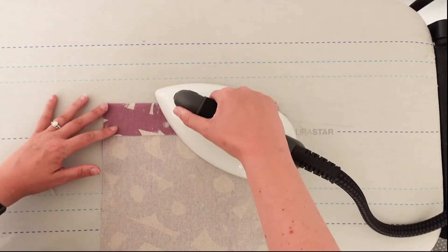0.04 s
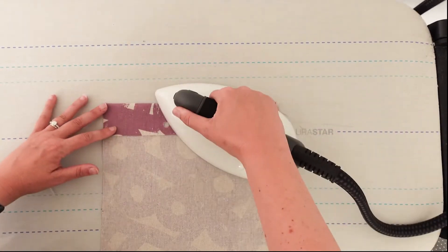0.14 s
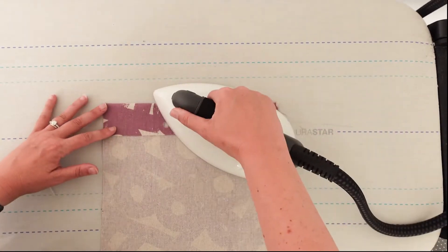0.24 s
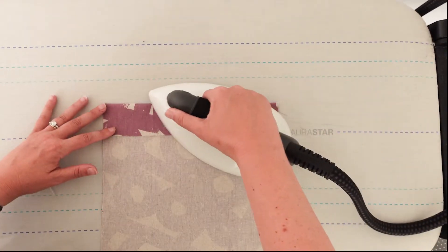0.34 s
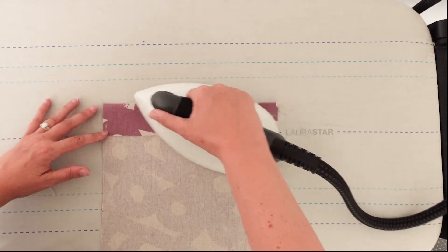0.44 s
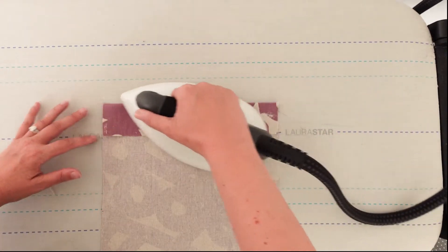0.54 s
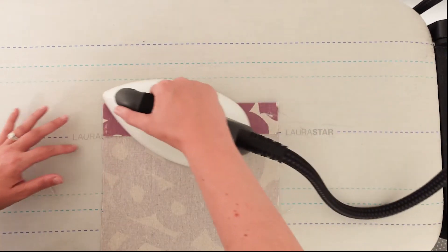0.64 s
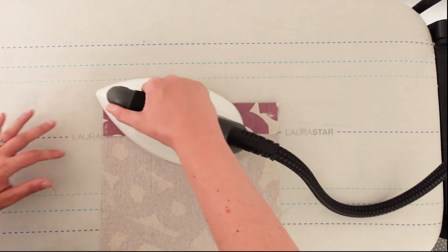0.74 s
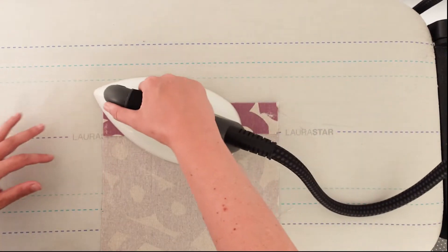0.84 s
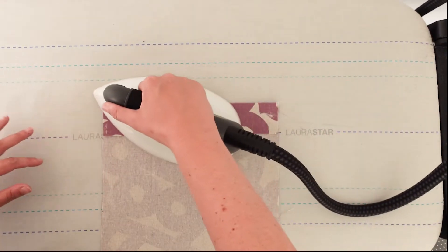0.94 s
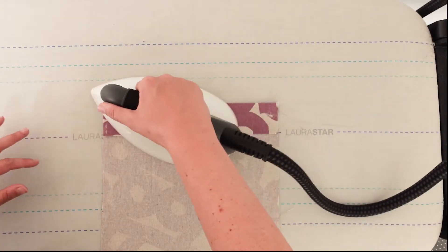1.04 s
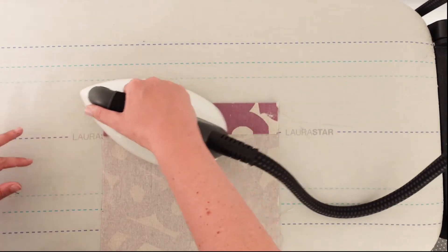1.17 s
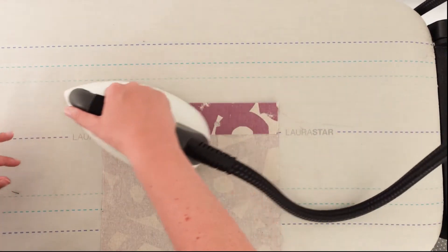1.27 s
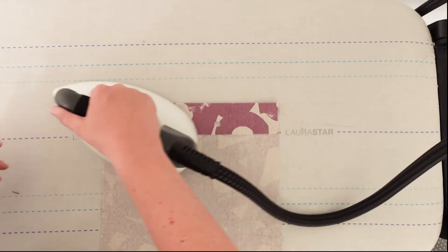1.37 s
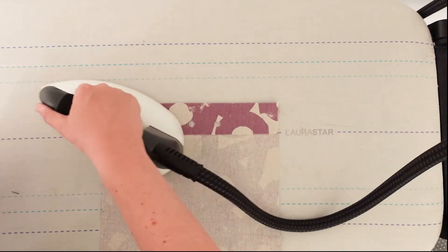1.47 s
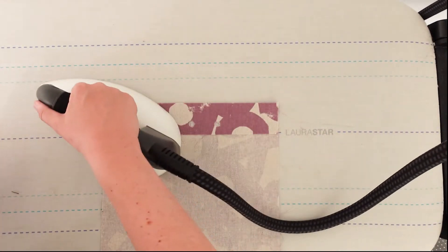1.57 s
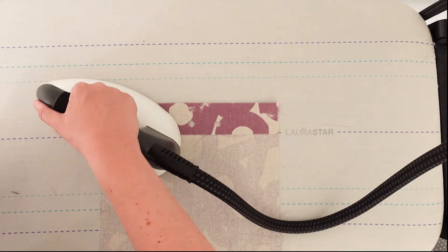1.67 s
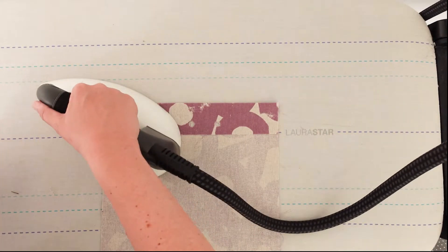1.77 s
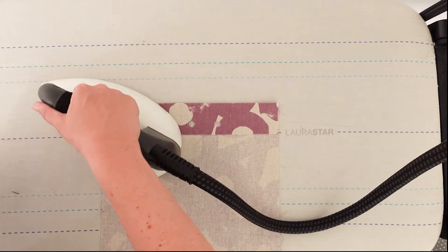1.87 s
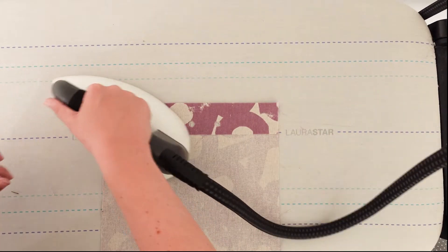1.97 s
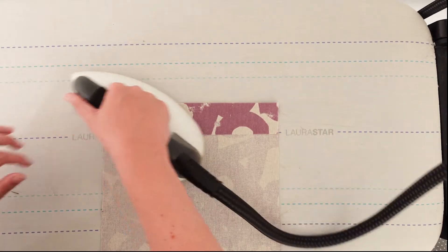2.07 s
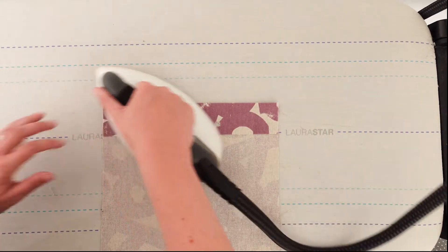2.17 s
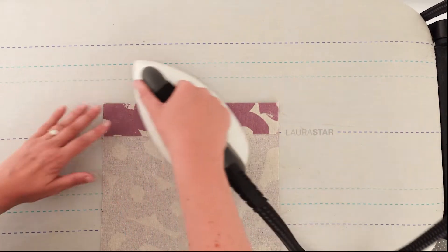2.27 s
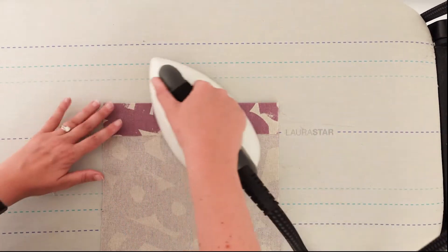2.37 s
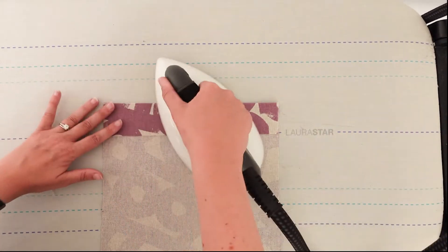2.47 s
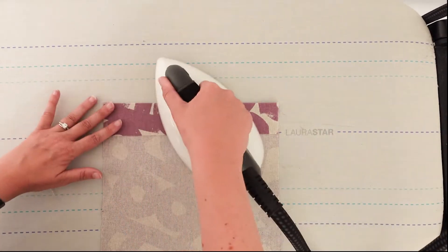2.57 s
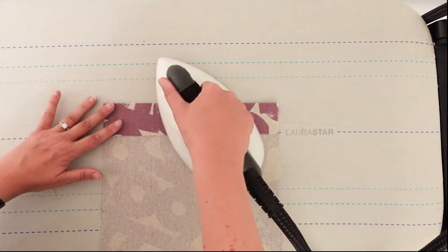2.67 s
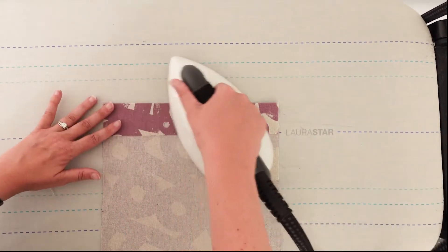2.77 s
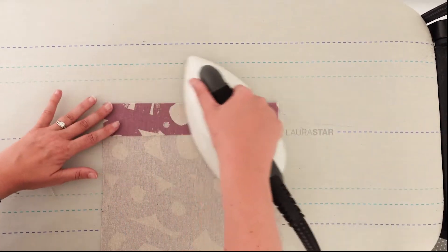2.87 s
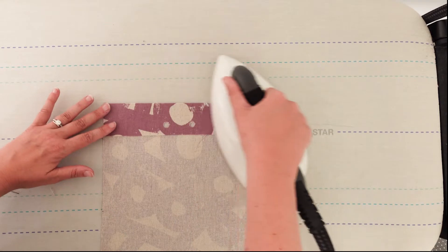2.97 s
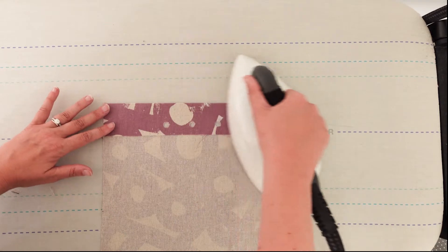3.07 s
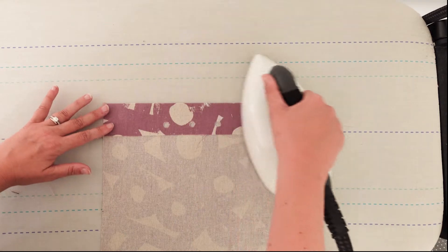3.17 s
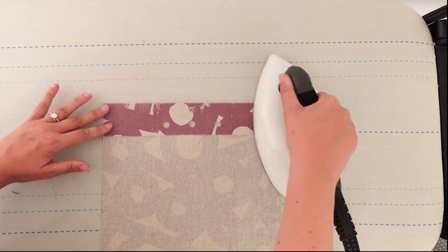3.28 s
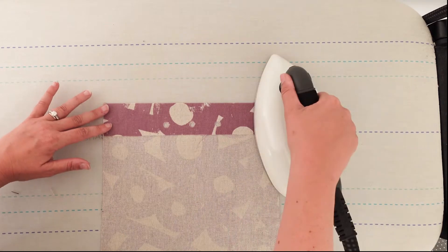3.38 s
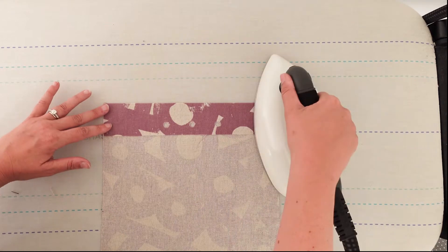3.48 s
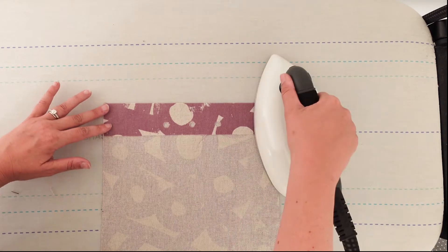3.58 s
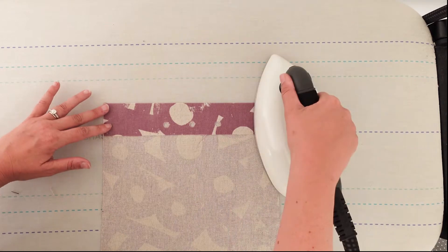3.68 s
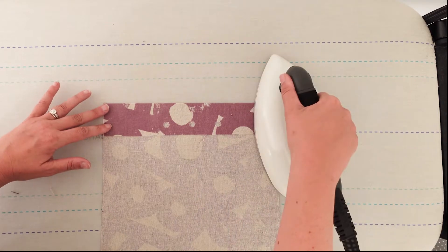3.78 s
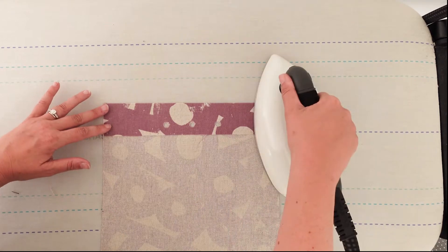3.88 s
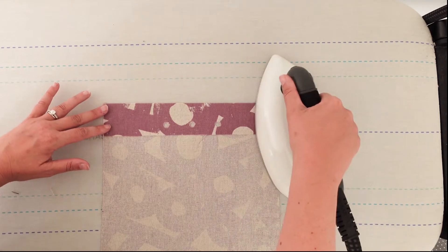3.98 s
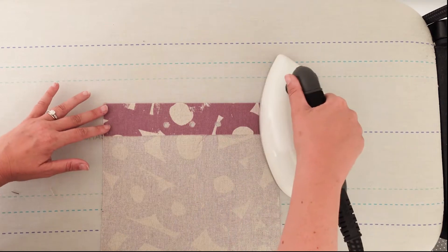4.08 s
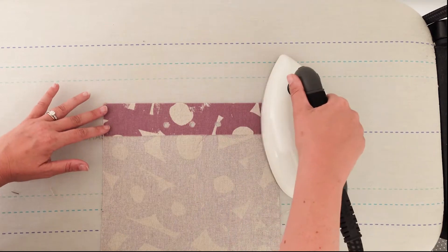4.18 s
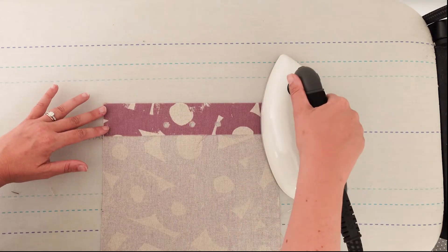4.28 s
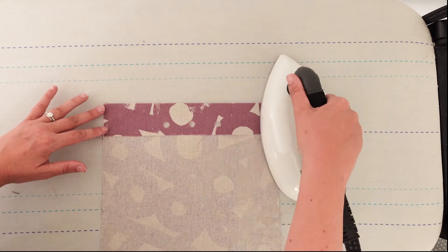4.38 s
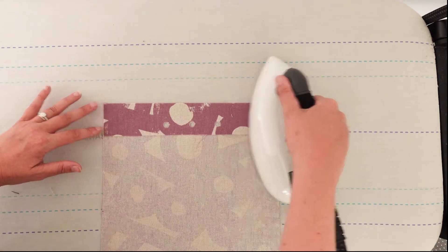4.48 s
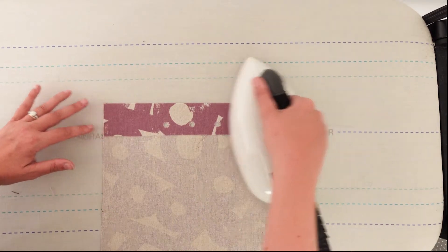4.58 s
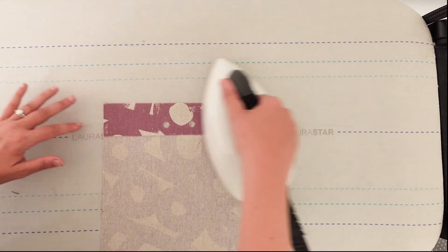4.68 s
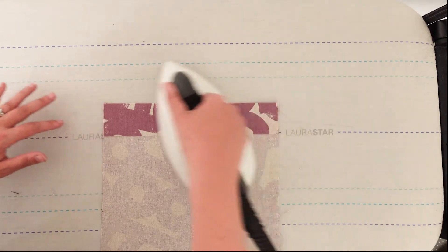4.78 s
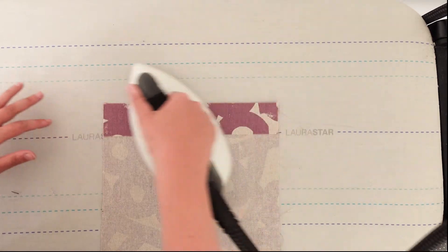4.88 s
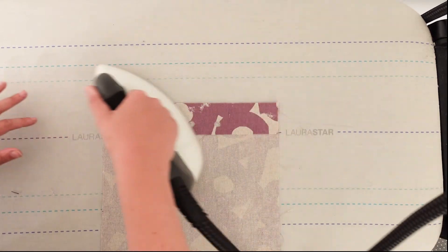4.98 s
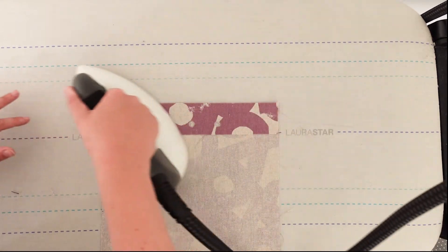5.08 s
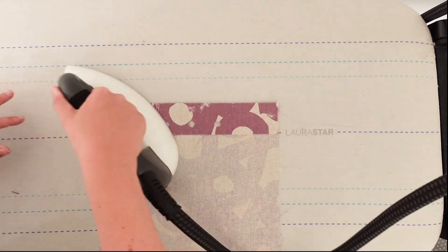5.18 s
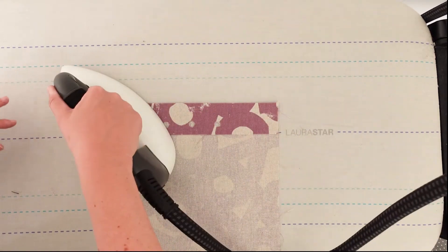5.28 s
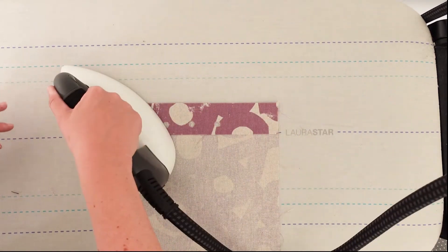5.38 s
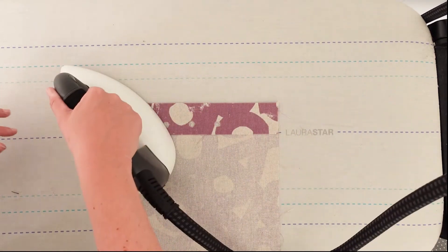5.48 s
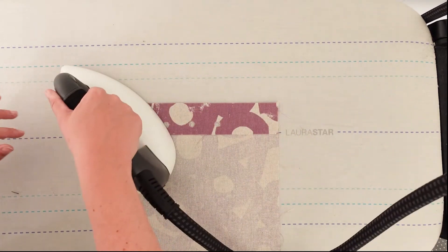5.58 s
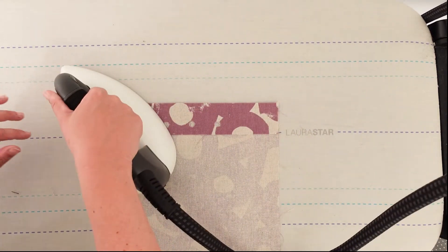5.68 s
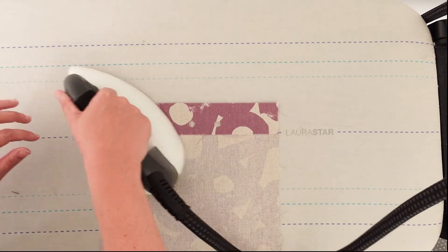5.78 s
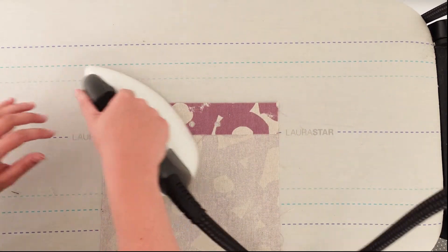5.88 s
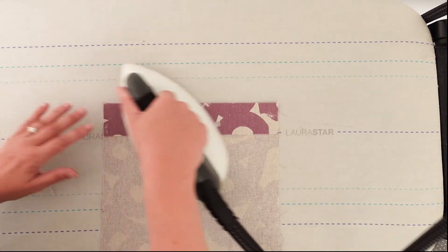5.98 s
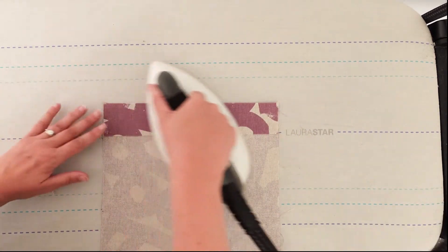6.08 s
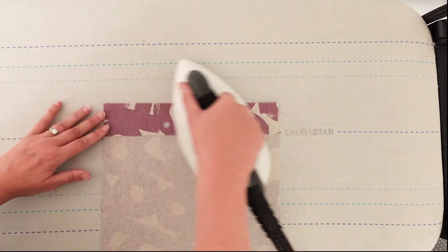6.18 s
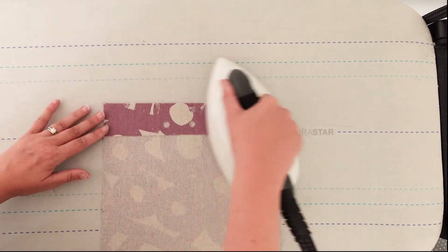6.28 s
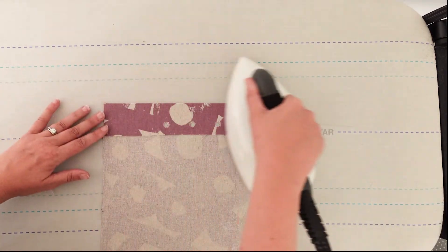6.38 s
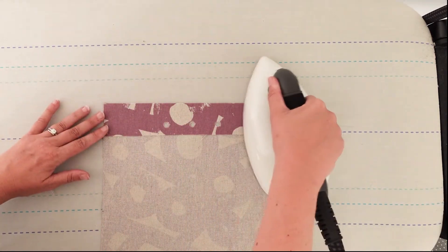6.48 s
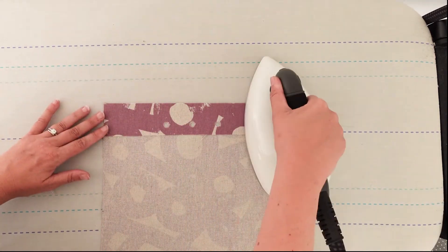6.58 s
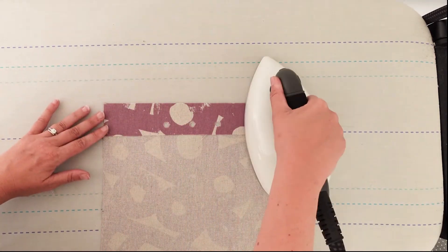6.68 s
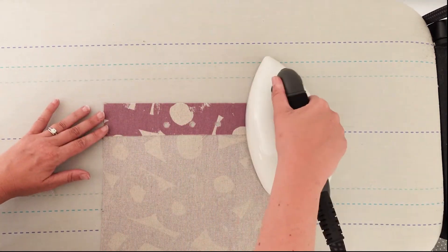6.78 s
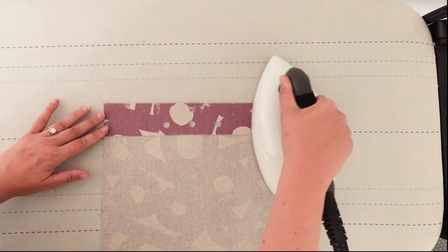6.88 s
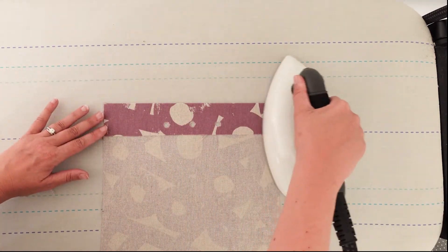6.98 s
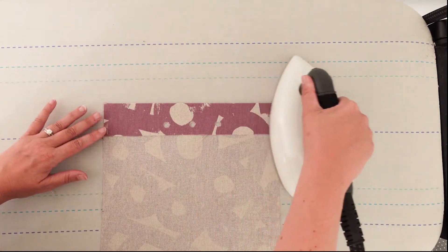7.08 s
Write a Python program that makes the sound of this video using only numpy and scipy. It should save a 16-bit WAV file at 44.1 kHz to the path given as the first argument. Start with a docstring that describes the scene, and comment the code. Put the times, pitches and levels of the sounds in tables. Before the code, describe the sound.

A steam iron works over cloth on a padded board, heard close in a small room with a steady low hum that eases a little after two seconds. Short bursts of steam come right at the start and at about 0.8, 1.7 and 2.5 seconds. Each begins with a light, ringing valve knock and a thin hiss, spits, then swells into a bright, slightly hollow rush; a second knock shuts it off and the hiss dulls and fades. Soft low bumps and brief scuffs of the iron on the board fall within the first second. A longer burst runs from 3.4 to about 4 seconds, followed by gentle bumps and a faint slide with small scuffs near 4.8. Another burst opens with a pop at 5.3 seconds. The iron slides faintly again around 6, and a last long hiss starts at 6.5, lasting to the end just after 7 seconds.

```python
"""A steam iron hisses as it presses cloth on a padded board in a small room, over a steady low hum. Seven times
its valve knocks open and rings the iron and the room: a thin hiss starts at once, the sole spits, and the
turbulent jet swells and brightens. When the valve knocks shut the pressure drains, treble first. The iron bumps
the board, scuffs and slides, and its place on the board colours the jet."""
import sys
import numpy as np
from scipy import signal
from scipy.fft import rfft, irfft
from scipy.io import wavfile
from scipy.ndimage import uniform_filter1d

SR = 44100
rng = np.random.default_rng(int(sys.argv[2]) if len(sys.argv) > 2 else 0)


def put_to_file(sound):
    """Save the sound as 16-bit audio at rate SR, in the file named by the first command-line argument."""
    columns = np.atleast_2d(sound).T  # one column per channel
    safe = np.clip(columns, -1, 1)
    whole_steps = np.round(safe * 32767)
    wavfile.write(sys.argv[1], SR, whole_steps.astype(np.int16))


N = 314874
TIME = np.arange(N) / SR
FREQS = np.maximum(np.fft.rfftfreq(N, 1 / SR), 1)


def undb(db):
    """Decibels to amplitude gain."""
    return 10 ** (np.asarray(db) / 20)


def curve(rows):
    """Linear interpolation of (time_s, value) rows at every sample."""
    return np.interp(TIME, *np.transpose(rows))


def spectrum(points):
    """Spectral envelope: gain from (frequency_hz, level_db) points joined on a log axis."""
    hz, db = np.transpose(points)
    return undb(np.interp(np.log(FREQS), np.log(hz), db))


def resonance(hz, width_hz):
    """Frequency response of a steep-sided resonance."""
    return 1 / (1 + ((FREQS / hz - hz / FREQS) * hz / width_hz) ** 2)


def noise(gain):
    """Gaussian noise of rms 1, shaped by a gain at every frequency."""
    x = irfft(rfft(rng.standard_normal(N)) * gain, N)
    return x / x.std()


def wander(rate_hz):
    """Slow random modulation of rms 1."""
    return noise(1 / (1 + (FREQS / rate_hz) ** 4))


def fade(t, t60):
    """Exponential decay by 60 dB in t60 seconds."""
    return np.exp(-np.log(1000) * t / t60)


def add(track, start_s, sound):
    """Superpose a sound on the track."""
    part = track[max(int(start_s * SR), 0):][:len(sound)]
    part += sound[:len(part)]


# resonances of the low drone: centre_hz, width_hz, level_db
DRONE_BANDS = [(116, 17, 1.5), (143, 22, 2)]
# course of the drone's level: time_s, level_db
DRONE_LEVEL = [(0, -50.5), (1.9, -49.5), (3.9, -57.5), (7.14, -57.5)]
# tone in the hum: pitch_hz, level_db
HUM_TONES = [(143.5, -68.5)]
# spectrum of the room's background: frequency_hz, level_db
ROOM_SPECTRUM = [(20, -22.5), (45, -15.5), (75, -12), (110, -3.5), (160, -3), (220, -18.5), (288, -3),
                 (340, -10), (430, -0.5), (560, -14.5), (760, -13.5), (1200, -21.5), (2200, -29.5),
                 (5000, -39), (10000, -40.5), (16000, -51.5)]
def hum(room_db=-54, whirr_db=-5):
    """Amplitude modulation: a narrow-band drone, a tone and a whirr waver over broadband room noise."""
    level_db = curve(DRONE_LEVEL)
    flutter_db = 2.2 * wander(9)
    drone = noise(sum(undb(db) * resonance(hz, width) for hz, width, db in DRONE_BANDS))
    drone *= undb(level_db + flutter_db)
    drifting_s = np.cumsum(1 + 0.0033 * wander(4.2)) / SR
    tones = sum(np.sqrt(2) * undb(db + 2 * wander(3.09)) * np.sin(2 * np.pi * hz * drifting_s)
                for hz, db in HUM_TONES)
    whirr = noise(resonance(hz=420, width_hz=110)) * undb(level_db + whirr_db + 1.8 * wander(10))
    air = noise(spectrum(ROOM_SPECTRUM)) * undb(room_db + 1.4 * wander(6.3))
    return drone + tones + whirr + air


# steam bursts, levels relative: open_s, shut_s, jet_wait_s, fill_s, drain_s, spit_delay_s, spit_db,
# peak_flow_db, rush_db, tick_db, pop_db, opening_knock_db, shutting_knock_db
BURSTS = [(.008, 0.266, .188, 0.07, 0.32, 0.031, -4.5, -8, 0, -27, -24, -25.5, -27.5),
          (.8178, 1.087, 0.059, 0.22, 0.67, .036, -13.5, -1, -1, -43, -19, -27.5, -26),
          (1.676, 1.884, 0.063, 0.085, 0.7, 0.063, -8.5, -1.08, 0.15, -43.5, -28, -26, -25),
          (2.5352, 2.743, 0.097, 0.038, 0.71, 0.071, -4.5, -1.9, -0.5, -38, -30, -27.5, -26.5),
          (3.394, 3.949, 0.053, 0.092, 0.84, 0.058, -7, -0.25, -0.3, -39, -44, -28.5, -29),
          (5.26, 5.602, 0.038, 0.072, 0.67, 0.053, -6, -1, 1.5, -35.5, -15.5, -26.5, -28.5),
          (6.5172, 7.3, .005, 0.14, .9, 0.054, -6.5, -.5, 0, -46, -26.5, -29, -49)]
# modes rung by the valve knocks, in the iron and the room: pitch_hz, t60_s, opening_db, shutting_db
KNOCK_MODES = [(288.2, 0.28, -10.5, -3.5), (338.2, 0.053, 6, 7.5), (392, 0.0856, -19, -5),
               (431.8, 0.25, -1.5, -3), (484.4, 0.41, -12, -12), (667, 0.078, -2.5, -23.5),
               (757, 0.12, -7, -4), (1433, 0.15, -9.5, -18), (1684, 0.13, -1.5, -33),
               (1920, 0.075, -16, -45)]
def valve_knocks(pop_hz=540, pop_delay_s=0.0041, open_rise_s=0.0027, shut_rise_s=0.0032,
                 ring_db=-5, shell_hz=170, detune=0.02, flat_share=0.0825, settle_s=0.018):
    """Impact excitation: the valve knock rings modes of the iron and the room; opening also sends a pop down
    the hose."""
    out, t = np.zeros(N), np.arange(SR // 3) / SR
    swing = 2 * np.pi * pop_hz * (t - pop_delay_s)
    pop = swing * np.exp((1 - swing ** 2) / 2)
    # each ring starts a little flat and rises as the pressure settles
    warped_s = t - flat_share * settle_s * (1 - np.exp(-t / settle_s))
    hz, t60, open_db, shut_db = np.transpose(KNOCK_MODES)
    for opens, shuts, *_, pop_db, open_knock_db, shut_knock_db in BURSTS:
        mode_hz = hz * (1 + detune * rng.standard_normal(len(hz)))
        phase = rng.uniform(0, 2 * np.pi, (len(hz), 1))
        rings = np.sin(2 * np.pi * np.outer(mode_hz, warped_s) + phase) * fade(t, t60[:, None])
        add(out, opens, undb(pop_db) * pop)
        add(out, opens, undb(open_db + open_knock_db + ring_db) @ rings * (1 - np.exp(-t / open_rise_s)))
        add(out, shuts, undb(shut_db + shut_knock_db + ring_db) @ rings * (1 - np.exp(-t / shut_rise_s)))
    # the small shell radiates little bass
    return signal.sosfilt(signal.butter(1, shell_hz, "high", fs=SR, output="sos"), out)


# spectrum of the open valve's thin hiss: frequency_hz, level_db
VALVE_SPECTRUM = [(300, -24.5), (1300, -7.5), (1600, -5), (2000, -10), (4000, -16), (7000, -7), (8500, 0),
                  (10000, 3.5), (12300, -7), (14300, -8.5), (16000, 0)]
def valve_hiss(hiss_db=-40, rise_s=0.0024, spurt=0.49, spurt_t60=0.098, closing_t60=0.15):
    """Orifice noise: steam hisses through the open valve, hardest in the first spurt."""
    envelope = np.zeros(N)
    for opens, shuts, *_ in BURSTS:
        age = np.maximum(TIME - opens, 0)
        onset = np.minimum(age / rise_s, 1) * (1 + spurt * fade(age, spurt_t60))
        envelope += onset * fade(np.maximum(TIME - shuts, 0), closing_t60)
    return envelope * noise(spectrum(VALVE_SPECTRUM)) * undb(hiss_db)


def valve_ticks(lag_s=0.008, width_s=0.0031):
    """Broadband transient: a bright tick as the valve leaves its seat."""
    envelope = sum(undb(tick_db) * np.exp(-((TIME - opens - lag_s) / width_s) ** 2)
                   for opens, *_, tick_db, _, _, _ in BURSTS)
    return envelope * noise(resonance(hz=9500, width_hz=9000))


def steam_flow(sag_db_per_s=8.5, drain_power=2.265, surge_lag_s=0.004, surge_width_s=0.038):
    """Charge and discharge: the sole spits, fills and drains. Gives flow and rush strength in dB."""
    flow_db, rush_db = np.full(N, -120.), np.zeros(N)
    for opens, shuts, wait_s, fill_s, drain_s, spit_s, spit_db, peak_db, burst_rush_db, *_ in BURSTS:
        now = TIME >= opens
        age, since_shut = TIME[now] - opens, np.maximum(TIME[now] - shuts, 0)
        spit = undb(spit_db) * (age / spit_s * np.exp(1 - age / spit_s)) ** 2
        fill = 1 - np.exp(-np.maximum(age - since_shut - wait_s, 0) / fill_s)
        swell_db = 20 * np.log10(np.hypot(spit, fill / fill.max()) + 1e-6)
        # the shutting valve gives a last push, which counts for more in a weak burst
        push = np.exp(-((TIME[now] - shuts - surge_lag_s) / surge_width_s) ** 2)
        surge_db = 0.83 * push / undb(peak_db)
        # the flow then sags steadily and collapses
        drop_db = sag_db_per_s * since_shut + 60 * (since_shut / drain_s) ** drain_power
        flow_db[now] = peak_db + swell_db + surge_db - drop_db
        rush_db[now] = burst_rush_db
    return flow_db, rush_db


# spectrum of the jet at full flow: frequency_hz, level_db
JET_SPECTRUM = [(100, -35), (300, -26.5), (550, -23.5), (800, -5), (1250, -5), (1700, -2.5), (2700, -4.5),
                (4200, -0.04), (7000, 5), (9500, 2.5), (12000, -1.5), (15500, -6.5)]
def jet(flow_db, rush_db, jet_db=-22, rush_hz=2900, treble_hz=7600):
    """Turbulence under the sole: higher bands follow higher powers of the flow, so treble dies first."""
    hiss = rfft(noise(spectrum(JET_SPECTRUM)))
    low = 1 / (1 + (FREQS / rush_hz) ** 4)
    high = 1 / (1 + (treble_hz / FREQS) ** 4)
    rush = irfft(hiss * low, N) * undb(0.92 * flow_db + rush_db + 3.5)
    core = irfft(hiss * (1 - low - high), N) * undb(1.467 * flow_db)
    treble = irfft(hiss * high, N) * undb(2.96 * flow_db + 1)
    flutter_db = wander(21)
    return (rush + core + treble) * undb(jet_db + flutter_db)


# resonances of the steam channels in the sole: centre_hz, width_hz, level_db
CHANNEL_BANDS = [(1545, 160, -5), (1946, 46, -3), (2225, 72, -2), (2854, 47, 2), (3437, 89, -0.5),
                 (3720, 99, -2.5), (4380, 120, 1.5), (5210, 61, -2), (5715, 450, 0), (6340, 102, -5.5),
                 (8270, 300, -14)]
def sole_channels(flow_db, channels_db=-34.5, flow_power=1.44):
    """Duct resonance: the channels sound hollow, swelling and fading with the flow."""
    channels = noise(sum(undb(db) * resonance(hz, width) for hz, width, db in CHANNEL_BANDS))
    return channels * undb(channels_db + flow_power * flow_db)


# soft bumps of the iron on the board: start_s, level_db
BUMPS = [(.078, -52), (.14, -32), (0.425, -28), (0.665, -37), (0.733, -34), (0.79, -32), (2.384, -37),
         (3.911, -32.5), (4.256, -35)]
def board_bumps(board_hz=138, t60=0.15, rise_s=0.0089):
    """Damped oscillation: the padded board booms in one low mode under the iron."""
    out, t = np.zeros(N), np.arange(SR // 3) / SR
    boom = np.sin(2 * np.pi * board_hz * t) * fade(t, t60) * (1 - np.exp(-t / rise_s))
    for start_s, db in BUMPS:
        add(out, start_s, undb(db) * boom)
    return out


# short scuffs of sole and hose: start_s, length_s, level_db
SCUFFS = [(.138, .035, -45), (.182, .04, -41), (.753, .012, -51), (4.762, .01, -46.5), (4.839, .018, -52),
          (6.326, .012, -46), (6.345, .04, -57)]
def scuffs():
    """Brief friction: each rub gives a pulse of midrange noise."""
    contact = np.zeros(N)
    for start_s, length_s, db in SCUFFS:
        add(contact, start_s, undb(db) * np.hanning(int(length_s * SR)) ** 0.5)
    rub = noise(resonance(730, 230) + 0.45 * resonance(1230, 280) + 0.009 * resonance(3000, 3000))
    return contact * rub


# slides of the iron over the cloth: start_s, end_s, place_reached, friction_db
SLIDES = [(.4, 0.904, "left", -72), (2.107, 2.502, "middle", -89.5), (2.794, 3.25, "right", -73.5),
          (4.5, 5.201, "corner", -75), (5.85, 6.203, "middle", -70), (6.2, 6.515, "right", -69.5)]
def glide(ease_s=0.22):
    """Sliding friction: noise from the sole on the weave swells and dies away with each slide."""
    friction = sum(undb(db) * ((TIME >= start) & (TIME < end)) for start, end, _, db in SLIDES)
    envelope = uniform_filter1d(friction, int(ease_s * SR))
    return noise(resonance(hz=3300, width_hz=5000)) * envelope * undb(wander(20))


# peaks and notches of the path from under the sole, at four places: centre_hz, width_hz, gain_db
LEFT_PATH = [(480, 230, 15.5), (1030, 135, 6.5), (1122, 120, -6), (1627, 46, 7.5), (1870, 210, 2.5),
             (2670, 450, 2), (3740, 2500, 1), (5540, 207, 2), (7100, 430, 2.5), (11600, 1720, -2)]
MIDDLE_PATH = [(413, 220, 16.5), (630, 42, 0.5), (730, 25, 9.5), (1026, 65, 5), (1302, 51, 5.5),
               (1410, 88, -5), (2700, 400, -2.5), (4400, 930, 5), (5300, 640, -2), (13700, 5400, -2)]
RIGHT_PATH = [(470, 99, 10.5), (730, 100, -1.5), (713, 50, -4.5), (1026, 320, -2.5), (1840, 270, -3.5),
              (2460, 130, -0.5), (3660, 520, 2.5), (4640, 58, -3.5), (6970, 840, -3), (12400, 2460, 3.5)]
CORNER_PATH = [(486, 77, 13.5), (594, 49, 2.5), (704, 110, 4.5), (960, 99, 5), (1130, 73, -6),
               (2420, 500, 8), (2360, 260, -9), (5260, 340, -3.5), (7200, 1200, 2), (13200, 7600, -3.6)]
def path_colour(source, start_place="middle"):
    """Transfer function: the path to the listener colours the steam, and changes as the iron slides."""
    paths = {"left": LEFT_PATH, "middle": MIDDLE_PATH, "right": RIGHT_PATH, "corner": CORNER_PATH}
    heard = {}
    for place, path in paths.items():
        gain_db = sum(db * np.exp(-((FREQS - hz) / width) ** 2) for hz, width, db in path)
        heard[place] = irfft(rfft(source) * undb(gain_db), N)
    out = heard[start_place]
    for start, end, place, _ in SLIDES:
        out = out + curve([(start, 0), (end, 1)]) * (heard[place] - out)
    return out


def walls(x, wet_db, t60=0.25, first_echo_s=0.00415):
    """Reverberation: dense reflections from the board and near walls decay exponentially."""
    t = np.arange(SR // 3) / SR
    tail = rng.standard_normal(len(t)) * fade(t, t60) * (t > first_echo_s)
    return x + undb(wet_db) * signal.fftconvolve(x, tail / np.linalg.norm(tail))[:N]


def scene():
    """Superposition: steam, contact sounds and hum add up, the same left and right."""
    flow_db, rush_db = steam_flow()
    sole = path_colour(jet(flow_db, rush_db) + sole_channels(flow_db))
    steam = walls(sole + valve_hiss() + valve_ticks(), wet_db=-14)
    contacts = walls(valve_knocks() + board_bumps() + scuffs() + glide(), wet_db=-8)
    return np.tile(steam + contacts + hum(), (2, 1))


def record(dry):
    """Band limiting: a steep low-pass filter cuts the highest treble."""
    cutoff_hz = 15900
    return signal.sosfilt(signal.ellip(12, 0.1, 80, cutoff_hz, fs=SR, output="sos"), dry)


dry = scene()
out = record(dry)
put_to_file(out)
```